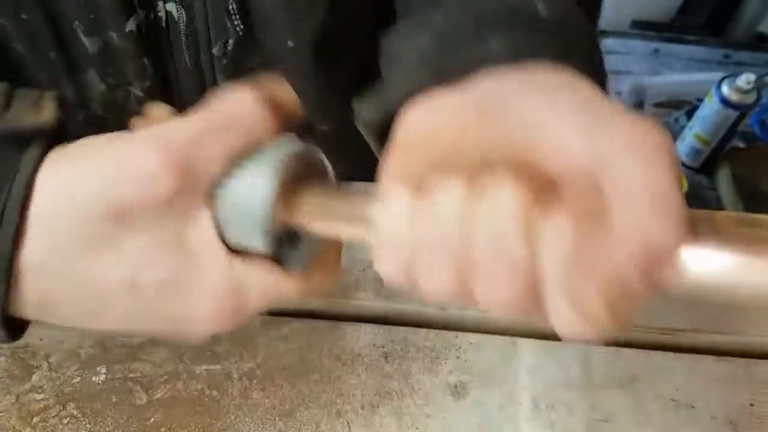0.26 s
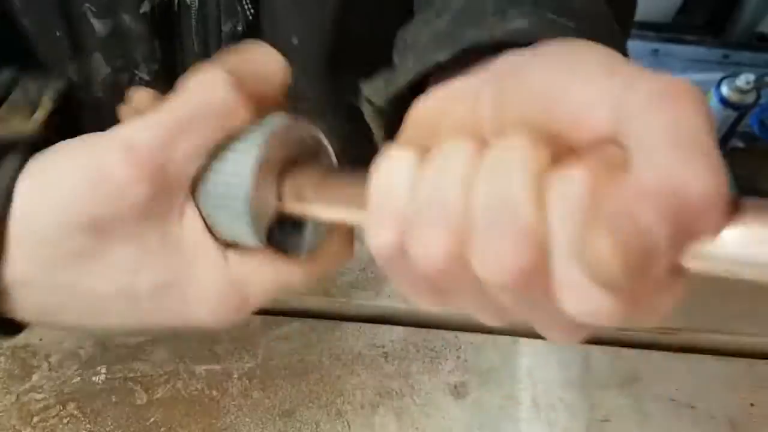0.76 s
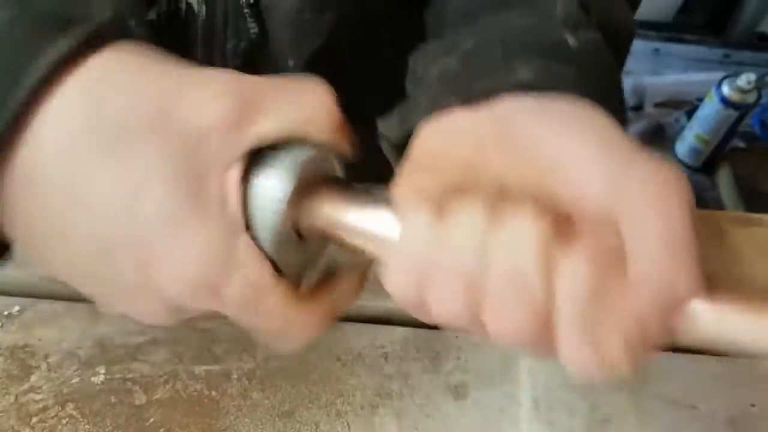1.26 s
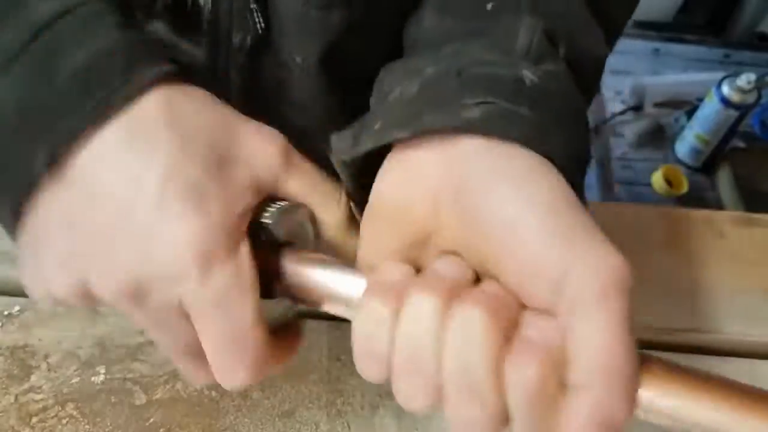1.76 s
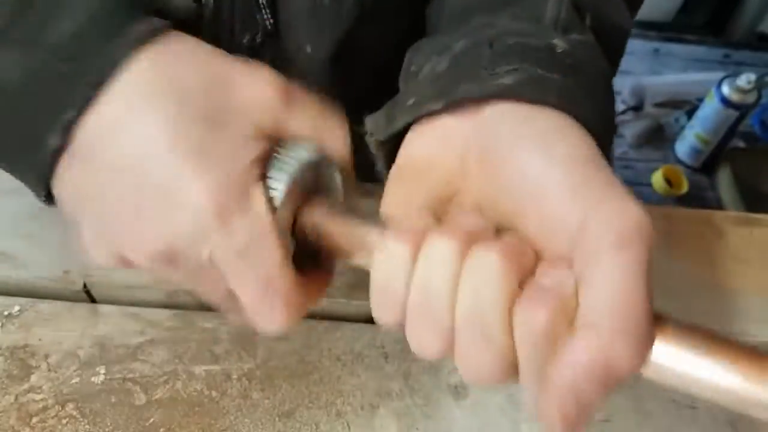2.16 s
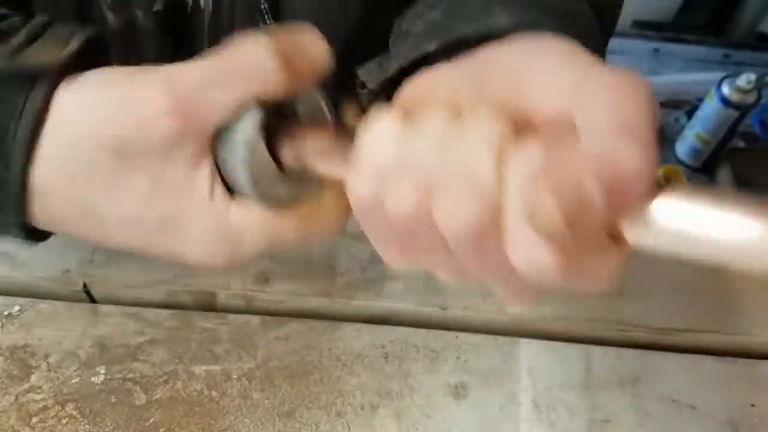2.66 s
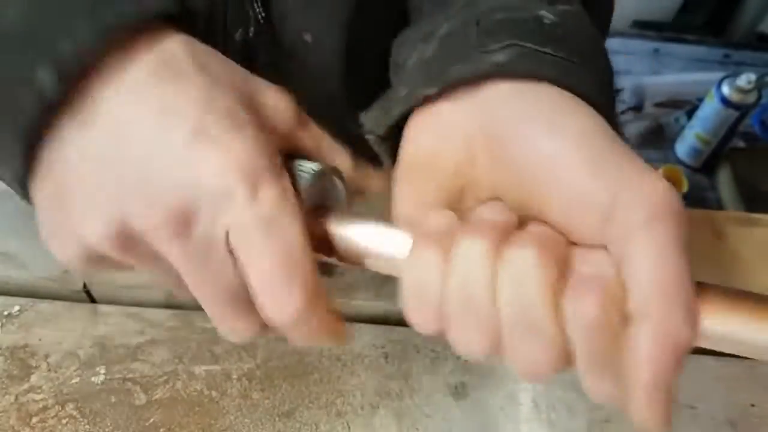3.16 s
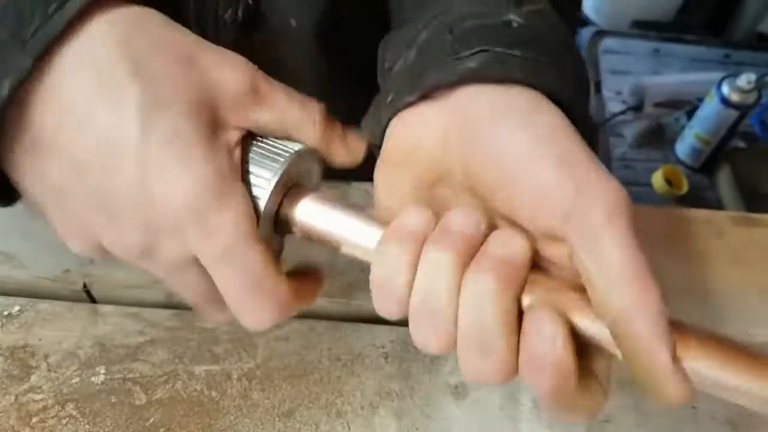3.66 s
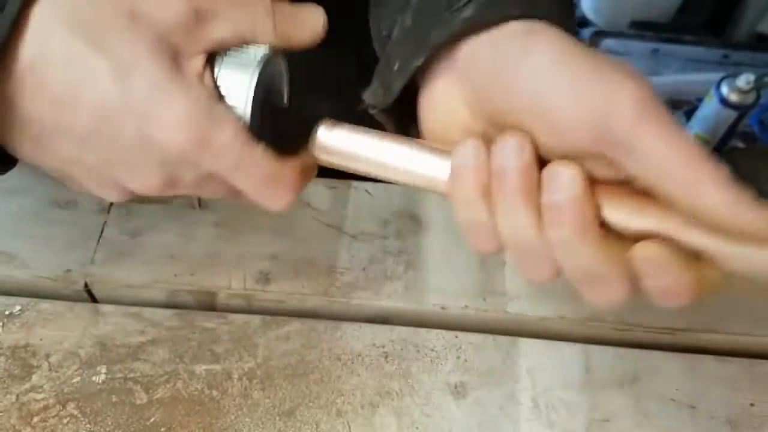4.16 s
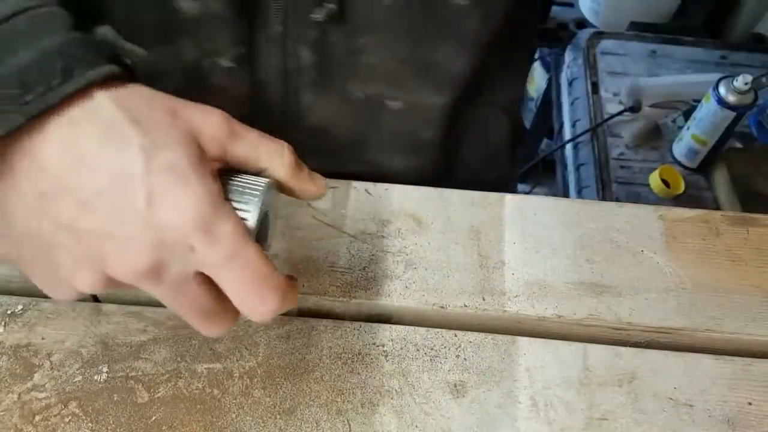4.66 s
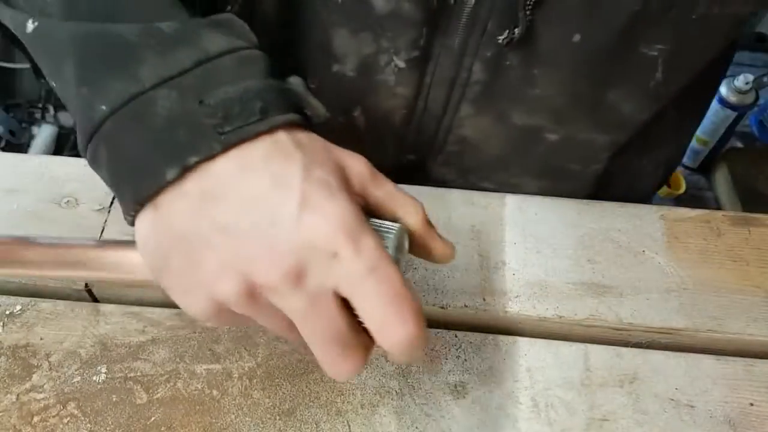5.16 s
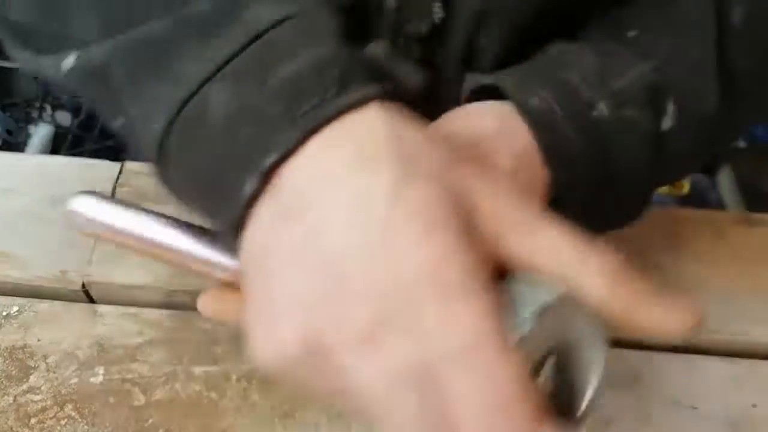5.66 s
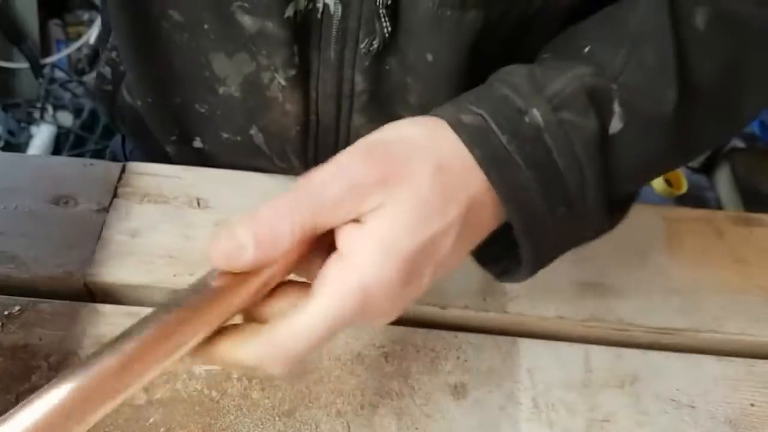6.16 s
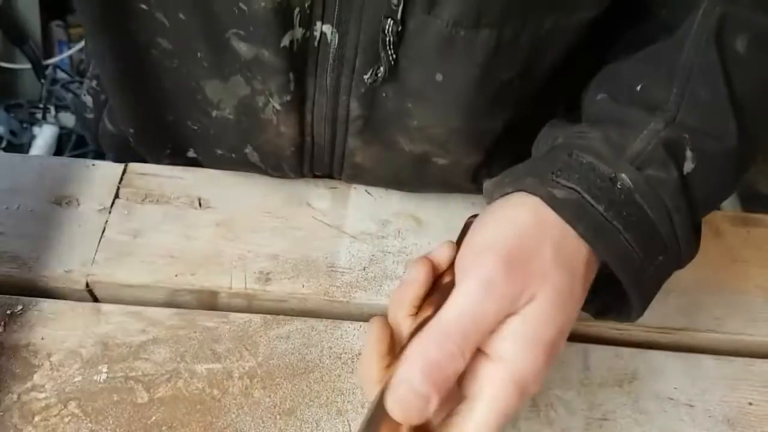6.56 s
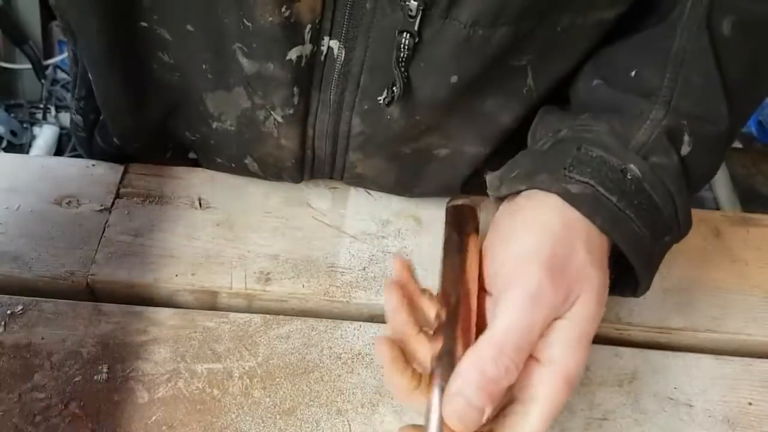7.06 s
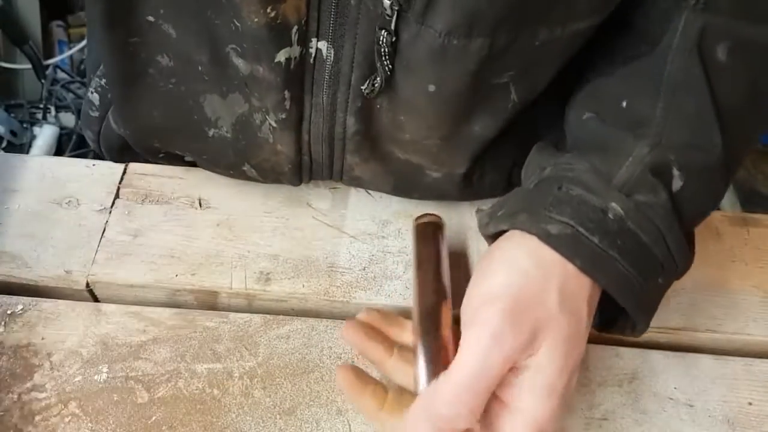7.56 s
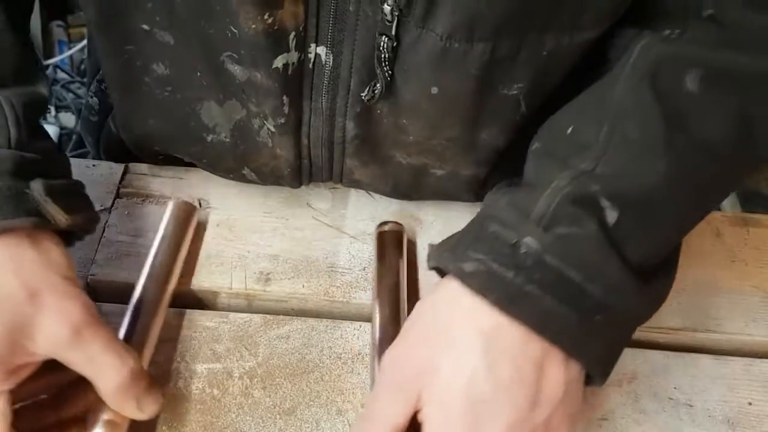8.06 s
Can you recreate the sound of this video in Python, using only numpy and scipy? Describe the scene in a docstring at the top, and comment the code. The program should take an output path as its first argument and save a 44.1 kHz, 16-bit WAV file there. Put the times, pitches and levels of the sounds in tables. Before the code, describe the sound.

Close up in a small workshop, a cutter is twisted round a copper pipe in short strokes: gritty ticks, soft scraping and tiny squeaks, with sharp cracks. After the pipe parts, the long piece clatters on a plank bench with a slight ring, hands rustle and tap metal, and the short piece and cutter knock down. A faint low drone and hiss stay underneath.

```python
"""Room hiss and a wavering low drone, both made from coloured noise (the drone also has a hum), run throughout.
A cutter is twisted round a copper pipe: random clicks make it grind, short bursts make it tick and crack.
It squeaks in brief wavering tones, until the pipe parts. The hands then rustle and touch the metal.
First the long piece, then the short one, and the cutter, bump down on a plank bench: each blow sets
decaying sines ringing in bench and pipe, with coloured clicks for the contact. Fingers also tap the short piece."""
import sys
import numpy as np
from scipy import signal
from scipy.fft import rfft, irfft, next_fast_len
from scipy.io import wavfile
from scipy.ndimage import uniform_filter1d

SR = 44100
rng = np.random.default_rng(int(sys.argv[2]) if len(sys.argv) > 2 else 0)


def transcribe(signal):
    """Save signal, clipped to [-1, 1], as a 16-bit WAV file at the path in sys.argv[1]."""
    frames = np.atleast_2d(signal).T
    limited = np.clip(frames, -1, 1)
    pcm = np.round(limited * 32767).astype(np.int16)
    wavfile.write(sys.argv[1], SR, pcm)


N = 366426
TIME = np.arange(N) / SR  # seconds

# Levels in the tables are relative: the ..._db settings in the calls shift them.
# how loud the low drone is over time: t/s, level/dB
DRONE_LEVEL = [(0.0, -70), (0.39, -75), (1.04, -46.5), (2.8, -51), (3.38, -48), (4.3, -53.5), (5.07, -43.5),
               (6.36, -56), (6.71, -53), (7.82, -54), (7.98, -50.5), (8.31, -49)]
# tone colour of the drone's rumble: f/Hz, level/dB
DRONE_COLOUR = [(20, -27), (42, -16.5), (55, -12.5), (65, 1), (76, -8.5), (100, -12), (140, -27.5),
                (230, -19), (400, -32.5), (900, -48)]
# tone colour of the room hiss: f/Hz, level/dB
AIR_COLOUR = [(15, -36), (25, -7.5), (69, -3.5), (89, -4), (156, -27), (215, -11), (340, -17), (433, -10),
              (684, -16), (848, -15), (1900, -20.5), (6380, -31), (13200, -30.5), (15500, -43.5)]
DRONE_HZ, AIR_DB = 65, -54.5
# the wrist twists the cutter round the pipe: t/s, length/s, grinding/dB, sliding hiss/dB
TWISTS = [(0.231, 0.041, -47, -48), (0.637, 0.016, -46, -50), (0.719, 0.084, -45.5, -50.5),
          (1.166, 0.066, -51, -53), (1.558, 0.044, -40, -45), (1.939, 0.032, -40.5, -48.5),
          (2.287, 0.041, -44, -50.5), (2.636, 0.047, -39.5, -49), (2.979, 0.056, -45, -49),
          (3.368, 0.05, -44, -47), (3.514, 0.11, -61, -65), (4.094, .03, -48, -49)]
# hands and sleeves slide over the metal: t/s, length/s, rubbing/dB, sliding hiss/dB
SLIDES = [(.01, 0.045, -59, -46), (.14, 0.086, -49, -45), (.42, 0.13, -77, -56), (3.87, 0.019, -47.5, -51),
          (3.99, 0.06, -56.5, -51), (5.45, 0.46, -52, -55), (5.71, 0.07, -42.5, -48),
          (5.915, 0.026, -44, -38), (6.03, 0.083, -55, -48.5), (6.19, 0.025, -44, -52.5),
          (6.31, 0.085, -62, -56), (7.04, 0.062, -61, -69), (7.52, 0.043, -69, -57), (8.27, .03, -46, -69)]
# the wheel and rollers stick and squeak: t/s, f/Hz (centre pitch), level/dB
SQUEAKS = [(.228, 9300, -45), (.756, 1900, -38.5), (1.575, 2620, -36), (1.941, 1860, -35.5),
           (2.307, 9500, -33.5), (2.329, 854, -35), (3.028, 1820, -35.5), (3.372, 874, -36),
           (3.524, 3480, -27), (3.561, 1375, -28), (4.098, 1900, -23)]
# the wheel slips in its groove: t/s, grind/dB, tick/dB, length/s
SLIPS = [(.236, -32.5, -42.5, 0.0037), (.672, -32.5, -41.5, 0.0031), (.717, -45, -34.5, 0.0018),
         (.758, -26.5, -40, 0.0028), (1.186, -27.5, -39, 0.0026), (1.226, -27.5, -57, 0.0016),
         (1.573, -25.5, -44, 0.0036), (1.592, -39, -34, .0013), (1.894, -31, -46.5, 0.0024),
         (1.937, -30, -46, 0.0024), (1.965, -46, -55, 0.0049), (2.308, -28.5, -29.5, 0.00065),
         (2.332, -23, -46, 0.0012), (2.641, -24.5, -40, 0.0022), (2.699, -36, -41.5, .0033),
         (2.971, -25.5, -50, 0.001), (3.023, -29, -54, 0.0047), (3.372, -26, -43, 0.0037),
         (3.438, -30, -40, .0024), (3.450, -13, -24, 0.0023), (3.52, -26.5, -45, .004),
         (3.537, -26, -37, 0.0049), (3.562, -19, -41, 0.0078), (3.576, -38, -29.5, 0.0059),
         (3.603, -45, -47, 0.002), (4.081, -43, -40, 0.0024), (4.095, -14, -26.5, 0.0025),
         (4.101, -35, -20.5, 0.0011)]
# the copper wall cracks: t/s, level/dB, length/s
CRACKS = [(1.1595, -18, 0.0025), (1.164, -17.5, 0.00093), (1.168, -11.5, 0.0022), (1.18, -51.5, .002)]
# light touches of fingers and metal: t/s, rub/dB, tick/dB, length/s
TOUCHES = [(4.506, -65, -55, 0.0017), (5.01, -42, -55, 0.0053), (5.764, -38, -42, 0.0025),
           (5.797, -34, -65, 0.004), (5.854, -44, -41.5, 0.0022), (5.913, -31.5, -49, 0.0038),
           (5.932, -28, -52, 0.0018), (6.069, -48, -44.5, 0.009), (6.203, -46, -62, 0.0016),
           (6.857, -38.5, -50.5, 0.0018), (6.909, -45.5, -75, 0.0035), (8.018, -43.5, -74, 0.003)]
# tone colours of grinding, sliding skin, slip body, slip edge and cracking wall: f/Hz, level/dB
GRIND_COLOUR = [(100, -31.5), (230, -15.5), (400, 3), (620, -10.5), (850, -1), (1100, -3.5), (1400, -0.5),
                (1900, -3), (2700, -5), (3500, -10), (6000, -19), (15000, -53)]
HISS_COLOUR = [(800, -7), (2500, 0), (4500, 3.5), (6500, 1), (9500, 0.5), (13000, 0), (16000, 3)]
GRIT_COLOUR = [(150, -33), (300, -15.5), (500, -13), (700, -5.5), (900, -2), (1250, 0.5), (1650, 1),
               (2100, -3.5), (2700, -5), (3500, -14.5), (6000, -20), (15000, -47)]
TICK_COLOUR = [(1000, -3.5), (2500, 4.5), (3500, 3), (4800, 5.5), (5600, 1), (6700, 1.5), (7400, 0),
               (8200, -1), (9700, -7.5), (11000, -3), (13500, -5.5), (16000, -37)]
CRACK_COLOUR = [(200, -22), (1000, -22), (2300, -18), (3000, -10), (3700, -2), (4200, -13.5), (5000, -0.5),
                (6200, -5.5), (7500, -4), (8400, 3.5), (9600, -15), (11800, 0), (13200, -9.5),
                (15400, -2.5)]
# hand and cutter on the bench: t/s, planks/dB, frame thud/dB, clack/dB, click/dB, loose board/dB
BUMPS = [(4.613, -34.5, -29, -67, -64.5, -72), (4.677, -47, -31, -69, -70, -72),
         (6.855, -44, -54, -63, -56.5, -54), (6.872, -34, -37, -58.5, -62, -63),
         (6.914, -34, -55, -57, -64, -49), (6.96, -64, -41.5, -73, -79, -70),
         (7.1415, -16.5, -25.5, -19, -36, -54), (7.255, -48, -36, -66, -75, -65)]
# each piece of pipe on the bench: t/s, planks/dB, frame thud/dB, clack/dB, click/dB,
# loose board/dB, pipe wall ring/dB, pipe bending ring/dB
LONG_BLOWS = [(4.906, -15.5, -41, -31.5, -42.5, -20, -48.5, -64),
              (5.087, -9.5, -31, -23, -46, -18.5, -33.5, -37.5),
              (5.136, -8.5, -44, -53, -52, -25, -42, -56), (5.163, -20.5, -31, -22.5, -37, -25, -32, -57),
              (5.177, -9, -30.5, -32, -45, -25, -32, -64), (5.19, -9.5, -27.5, -31, -53, -28, -34.5, -46),
              (5.212, -13.5, -24, -30, -37, -24, -48, -26.5)]
SHORT_BLOWS = [(6.476, -18, -39, -37, -71, -35.5, -75, -78),
               (6.597, -15.5, -35, -26.5, -42.5, -26, -73, -79),
               (6.626, -15.5, -41, -26.5, -53, -18.5, -73, -85),
               (6.647, -20.5, -37, -18.5, -48, -17, -72, -81),
               (7.792, -15.5, -42, -38, -50, -41, -50.5, -61), (8.121, -24, -60, -41.5, -54, -52, -69, -70),
               (8.158, -16.5, -52, -25.5, -47.5, -44, -42, -48)]
# fingers tap the short pipe: t/s, wall ring/dB, bending ring/dB
TAPS = [(5.766, -47, -43.5), (5.855, -66, -63), (6.02, -73, -64), (6.076, -47.5, -47), (6.35, -74, -58),
        (7.52, -69, -66), (7.575, -78, -62)]
# ringing tones (modes) of the bench: f/Hz, level/dB, t60/s (time to fall by 60 dB)
BENCH_MODES = [(75, 0.5, 0.26), (111, -6.5, 0.12), (128.8, -8.5, 0.23), (140.6, -1, 0.11), (227, 0, 0.32),
               (242.3, 0, 0.21), (298.6, -4.5, 0.31), (388.7, 0.5, 0.27), (439.5, 0.5, 0.26),
               (511.8, -10, 0.39), (581, -5.5, 0.26), (636.5, -1, 0.24), (724, -11.5, 0.23),
               (762, -9, 0.18), (859, -5, 0.19)]
# ringing tones of a loose board near the front edge: f/Hz, level/dB, t60/s
BOARD_MODES = [(1014, 1.5, 0.14), (1075, -9, 0.13), (1180, -27.5, 0.091)]
# tone colours of a blow on the planks, its hard clack and its bright click: f/Hz, level/dB
PLANKS_COLOUR = [(60, -21.5), (170, -5.5), (230, -10), (450, -0.5), (700, -1), (1000, -14), (2000, -24.5),
                 (5000, -50)]
CLACK_COLOUR = [(300, -11), (750, -2), (1050, 9), (1300, 1.5), (1550, 0), (1870, -2.5), (2150, -8),
                (2550, -7), (4000, -26), (9000, -69)]
CLICK_COLOUR = [(600, -4.5), (1500, 17), (2600, 23.5), (4000, 14.5), (5500, 6), (8000, 6.5), (10000, -1.5),
                (15500, -4)]
# ringing tones of each piece: f/Hz, level/dB, t60/s, share of bending (0-1)
LONG_PIPE = [(1686, -4.5, 0.47, 1), (3103, 2, 0.44, 0.12), (3700, -7.5, 0.61, 0.7),
             (3935, -17.5, 0.55, 0.3), (4200, -14.5, .45, 0.67), (4840, -11.5, 0.36, .56),
             (5250, -14, 0.49, 0.32), (6120, -22, .27, .3), (6790, -23, .3, 0.3), (8000, -24, .28, 0.4),
             (8900, -25, .3, .5), (10700, -24, 0.34, .02), (11120, -20, .28, 0.16), (11690, -21, 0.29, 0),
             (12900, -23, .2, .1)]
SHORT_PIPE = [(1540, 13.5, 0.23, 0.068), (1233, 8.5, 0.2, 0.9), (3760, 0, 0.38, 0.86), (3850, 9.5, 0.15, 1),
              (4700, 3.5, 0.33, 0.38), (7000, -14, .14, 0.096), (7280, -13, .2, .2), (8960, -13, .2, 0.27),
              (10900, -12, 0.22, 0.074), (11936, -8, .16, 0.072), (13750, -1, .1, 0.17)]
# how fast the room's echo dies: f/Hz, t60/s
ROOM_T60 = [(100, 0.5), (500, 0.1749), (2000, 0.1713), (6000, 0.18), (15000, 0.18)]
# how alike left and right are: f/Hz, likeness (0-1)
LIKENESS = [(100, 0.91), (250, 0.79), (500, 0.69), (1000, 0.018), (4000, 0.011)]
# left minus right: f/Hz, level/dB
BALANCE_DB = [(200, 1.3), (500, -1.5), (1000, -1), (4000, -3), (12000, -2)]

SWELL_S, FADE_S = 0.024, 0.015  # every rub builds up and dies away with these time constants
# after a twist the hand lets go and slides back over the cutter for a new grip
REGRIP_AFTER_S, REGRIP_S, REGRIP_RUB_DB, REGRIP_HISS_DB = 0.12, 0.11, -56.5, -57
# the fist chafes on the pipe until the piece comes off
PARTED_S, GRIP_RUB_DB, GRIP_HISS_DB = 4.1, -62, -67
SQUEAK_DECAY_S = 0.0042
MIC_LAG_S = 0.00009  # the cutter is heard later at the left microphone
BURST_SCALE = np.sqrt(SR / 100)  # a burst's dB is its rms if its energy were spread over 10 ms
CUTOFF_HZ = 15900


def from_db(db):
    """Turn decibels into a gain."""
    return 10 ** (np.asarray(db) / 20)


def rms_one(x):
    """Scale a sound so that its rms is 1."""
    return x / np.sqrt(np.mean(x ** 2) + 1e-20)


def at_hz(points, hz):
    """Read a table at any frequency, along a logarithmic axis."""
    knots, values = np.transpose(points)
    return np.interp(np.log(hz + 1), np.log(knots), values)


def level(times, db):
    """Gain along a level curve, all but silent outside it."""
    return from_db(np.interp(TIME, times, db, left=-120, right=-120))


def convolve(x, response):
    """Pass a sound through an impulse response (its echo of one click)."""
    return signal.fftconvolve(np.atleast_2d(x), np.atleast_2d(response), axes=-1)[:, :N]


def colour(spectrum, size=8192):
    """Impulse response with this tone colour, prompt (minimum-phase) and of unit energy."""
    log_gain = np.log(from_db(at_hz(spectrum, np.fft.rfftfreq(size, 1 / SR))))
    cepstrum = irfft(log_gain)
    # doubling the first half makes the response start at once instead of being symmetric
    response = irfft(np.exp(rfft(2 * cepstrum[:size // 2], size)))
    return response / np.linalg.norm(response)


def diffuse(size):
    """Stereo white noise from all sides: alike in the bass, almost unrelated in the treble."""
    alike = np.clip(at_hz(LIKENESS, np.fft.rfftfreq(size, 1 / SR)), 0, 1)
    mid, side = rfft(rng.standard_normal((2, size)))
    both = np.sqrt(1 + alike) * mid
    apart = np.sqrt(1 - alike) * side * [[1], [-1]]
    return irfft((both + apart) / np.sqrt(2), size)


def drift(rate):
    """Smooth random wandering of spread about 1, with rate new values a second."""
    return np.interp(TIME * rate, np.arange(N // 10), rng.standard_normal(N // 10))


def workshop(x, wet_db):
    """Add dense reflections from close walls, each frequency dying at its own speed."""
    hz, t, cells = signal.stft(diffuse(SR // 2), SR, nperseg=256)
    decay = from_db(-60 * t / at_hz(ROOM_T60, hz)[:, None])
    tail = signal.istft(cells * decay, SR)[1]
    tail *= np.minimum(TIME[:tail.shape[1]] / 0.0014, 1)  # reflections build up over 1.4 ms
    response = from_db(wet_db) * tail / np.linalg.norm(tail, axis=1, keepdims=True)
    response[:, 0] += 1  # direct sound
    return convolve(x, response / np.sqrt(1 + from_db(2 * wet_db)))


def background(drone_db, hum_db, air_db):
    """A low hum of wandering pitch sits in rumbling noise, over the faint hiss of the room."""
    noise = diffuse(next_fast_len(N))[:, :N]
    pitch = DRONE_HZ + 1.48 * drift(6.9)
    hum = np.sin(2 * np.pi * np.cumsum(pitch) / SR)
    rumble = convolve(noise, colour(DRONE_COLOUR))
    drone = from_db(drone_db) * rumble + from_db(hum_db) * hum
    drone = level(*np.transpose(DRONE_LEVEL)) * drone
    air = convolve(noise[:, ::-1], colour(AIR_COLOUR))  # same noise, played backwards
    return drone + from_db(AIR_DB + air_db) * air


def grains(per_s, spread_db):
    """Metal sticks and slips in tiny clicks of uneven size at random moments; rms 1."""
    sizes = from_db(spread_db * np.minimum(rng.exponential(1, N), 4))
    signed = sizes * rng.choice([-1, 1], N)
    return rms_one(signed * (rng.random(N) < per_s / SR))


def swells(starts, lengths, db):
    """Gain of a series of rubs: each builds up, holds while the hand moves, and dies away."""
    power = np.zeros(N)
    for s, length, level_db in zip(starts, lengths, db):
        near = slice(max(round(s * SR) - SR // 4, 0), round((s + length) * SR) + SR // 4)
        t = TIME[near] - s
        shape = np.exp(np.minimum(t, 0) / SWELL_S - np.maximum(t - length, 0) / FADE_S)
        power[near] += (from_db(level_db) * shape) ** 2
    return np.sqrt(power)


def rubbing(rows, grind_db, hiss_db, rough_db):
    """Rubbing metal grinds in coarse grains while skin slides over it with a fine hiss."""
    s, length, grind, hiss = np.transpose(rows)
    coarse = grains(1500, 3.45) * swells(s, length, grind + grind_db)
    coarse = coarse * from_db(rough_db * drift(70))
    fine = grains(14000, 5.1) * swells(s, length, hiss + hiss_db)
    return convolve(coarse, colour(GRIND_COLOUR)) + convolve(fine, colour(HISS_COLOUR))


def hand_moves():
    """The steady grip, the twists, and a slide back after each twist but the last."""
    grip = [(0, PARTED_S, GRIP_RUB_DB, GRIP_HISS_DB)]
    regrips = [(s + length + REGRIP_AFTER_S, REGRIP_S, REGRIP_RUB_DB, REGRIP_HISS_DB)
               for s, length, *_ in TWISTS[:-1]]
    return grip + list(TWISTS) + regrips


def squeaks():
    """Sticking and slipping makes a brief tone of wavering pitch that starts at once and dies away."""
    out = np.zeros(N)
    t = TIME[:SR // 10]
    for s, hz, db in SQUEAKS:
        waver = uniform_filter1d(rng.standard_normal(len(t)), size=40)
        tone = np.sin(2 * np.pi * np.cumsum(hz + 1100 * waver) / SR)
        tone *= (1 - np.exp(-t / 0.00026)) * np.exp(-t / SQUEAK_DECAY_S)
        start = round(s * SR)
        out[start:start + len(t)] += from_db(db) * tone / np.linalg.norm(tone)
    return out * BURST_SCALE


def bursts(times, db, lengths, spectrum):
    """Each slip or crack is a short volley of tiny fractures that swells and fades; db sets its energy."""
    out, volley = np.zeros(N), grains(9000, 3.33)
    for s, level_db, length in zip(times, db, lengths):
        start = round(s * SR)
        age = TIME[:SR // 10] / max(length, 0.0003)
        burst = volley[start:start + len(age)] * np.sqrt(age) * np.exp(-age)
        out[start:start + len(age)] += from_db(level_db) * burst / (np.linalg.norm(burst) + 1e-9)
    return convolve(out, colour(spectrum)) * BURST_SCALE


def ticking(rows, grind_db, tick_db):
    """A sudden slip has a gritty body and a bright edge."""
    s, grind, tick, length = np.transpose(rows)
    body = bursts(s, grind + grind_db, length, GRIT_COLOUR)
    edge = bursts(s, tick + tick_db, length, TICK_COLOUR)
    return body + edge


def from_right(x):
    """Sound from the right reaches the left microphone late, so delay the left channel."""
    size = next_fast_len(N + SR // 10)
    turn = np.exp(-2j * np.pi * np.fft.rfftfreq(size, 1 / SR) * MIC_LAG_S * [[1], [0]])
    return irfft(rfft(x, size) * turn, size)[:, :N]


def cutter():
    """The turning cutter grinds, slips and squeaks, and the copper wall cracks."""
    strokes = rubbing(hand_moves(), grind_db=-1.5, hiss_db=3.5, rough_db=2.5)
    slips = ticking(SLIPS, grind_db=-9.0, tick_db=0.5)
    cracks = bursts(*np.transpose(CRACKS), CRACK_COLOUR)
    return from_right(workshop(strokes + slips + cracks + squeaks(), wet_db=0.5))


def hands():
    """Skin and sleeves rub and tick on the metal as pipes and cutter are picked up and shifted."""
    rubs = rubbing(SLIDES, grind_db=-6, hiss_db=-5, rough_db=0.0)
    touches = ticking(TOUCHES, grind_db=-6.5, tick_db=2.5)
    return workshop(rubs + touches, wet_db=7.5)


def clicks(times, db):
    """One single-sample click for each blow."""
    out = np.zeros(N)
    np.add.at(out, np.round(np.asarray(times) * SR).astype(int), from_db(db))
    return out


def ring(strikes, hz, t60):
    """A struck mode is a dying sine: a click of height 1 starts one of about height 1."""
    r = from_db(-60 / (t60 * SR))  # decay per sample
    w = 2 * np.pi * hz / SR
    out, first = np.zeros(N), np.argmax(strikes != 0)
    out[first:] = signal.lfilter([0, np.sin(w)], [1, -2 * r * np.cos(w), r * r], strikes[first:] + 1e-18)
    return out


def mode_pair(times, db, hz, t60):
    """One mode at both microphones: nearly in step in the bass, about a quarter cycle apart in the treble."""
    lag = (1 - np.clip(at_hz(LIKENESS, hz), 0, 1)) / hz / 4
    return np.array([ring(clicks(times + late, db), hz, t60) for late in (lag, 0)])


def bench(rows, thud_db, modes_db, planks_db, board_db, clack_db, click_db):
    """Weight shakes the frame, the blow rings the planks, and a hard contact adds clack and click."""
    s, planks, thud, clack, click, board = np.transpose(rows)[:6]
    out = 0
    for k, (hz, mode_db, t60) in enumerate(BENCH_MODES):
        drive = thud + thud_db if hz < 180 else planks + modes_db  # the frame has the lowest modes
        out = out + (-1) ** k * mode_pair(s, drive + mode_db, hz, t60)
    for hz, mode_db, t60 in BOARD_MODES:
        out = out + mode_pair(s, board + board_db + mode_db, hz, t60)
    contact = (convolve(clicks(s, planks + planks_db), colour(PLANKS_COLOUR))
               + convolve(clicks(s, clack + clack_db), colour(CLACK_COLOUR))
               + convolve(clicks(s, click + click_db), colour(CLICK_COLOUR)))
    return out + workshop(contact, wet_db=20.0)


def pipe(rows, modes, ring_db, split_hz=13, twin_db=-8):
    """A blow rings wall and length; the tube is not quite round, so each mode beats with a twin."""
    s, *_, wall, bending = np.transpose(rows)
    out = 0
    for hz, mode_db, t60, share in modes:
        drive = wall + np.clip(share, 0, 1) * (bending - wall) + mode_db + ring_db
        out = out + mode_pair(s, drive, hz, t60)
        out = out + mode_pair(s, drive + twin_db, hz + split_hz, t60)
    return out


def scene():
    """Mix the work, balance it between left and right by frequency, and add the background."""
    long_piece = bench(LONG_BLOWS, thud_db=3.0, modes_db=-17.5, planks_db=21.5,
                       board_db=-1.5, clack_db=27, click_db=28.5)
    short_piece = bench(SHORT_BLOWS, thud_db=5.5, modes_db=-10.5, planks_db=20.5,
                        board_db=2.5, clack_db=25.5, click_db=32.5)
    bumps = bench(BUMPS, thud_db=3.0, modes_db=-15.0, planks_db=17.0,
                  board_db=-8, clack_db=14, click_db=36.0)
    long_rings = pipe(LONG_BLOWS, LONG_PIPE, ring_db=3)
    short_rings = pipe(SHORT_BLOWS, SHORT_PIPE, ring_db=0.0)
    taps = pipe(TAPS, SHORT_PIPE, ring_db=-10.5)
    work = cutter() + hands() + bumps + long_piece + long_rings + short_piece + short_rings + taps
    size = next_fast_len(N + SR // 10)
    pan = from_db(at_hz(BALANCE_DB, np.fft.rfftfreq(size, 1 / SR)) * [[0.5], [-0.5]])
    balanced = irfft(rfft(work, size) * pan, size)[:, :N]
    return balanced + background(drone_db=-0.5, hum_db=-0.5, air_db=-2)


def record(dry):
    """A steep low-pass filter cuts off the top treble."""
    low_pass = signal.ellip(12, 0.1, 80, CUTOFF_HZ, fs=SR, output="sos")
    return signal.sosfilt(low_pass, dry)


dry = scene()
out = record(dry)
transcribe(out)
```